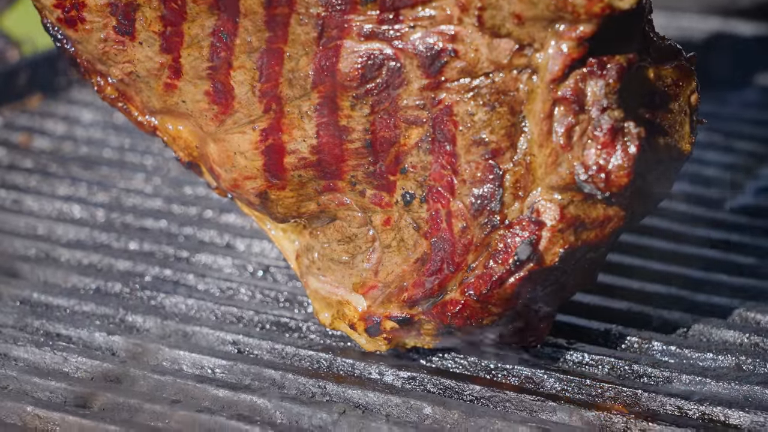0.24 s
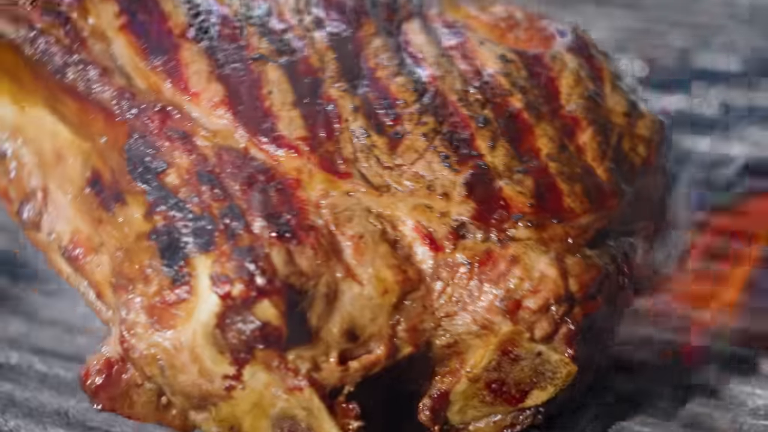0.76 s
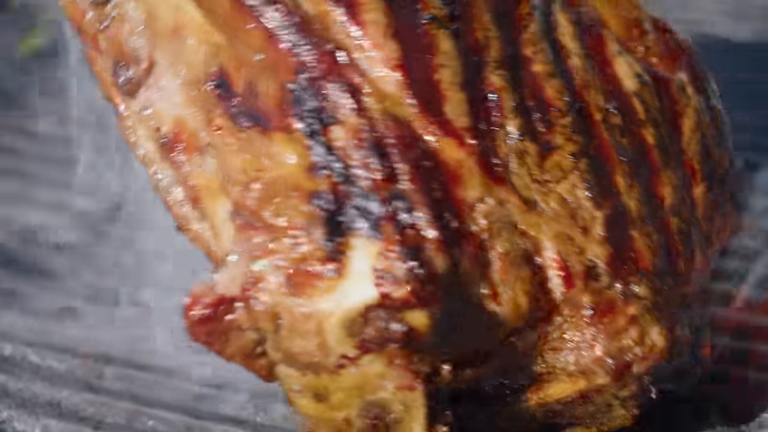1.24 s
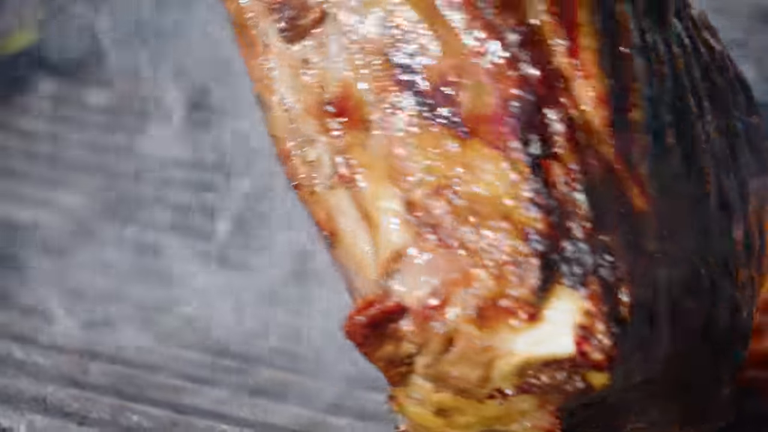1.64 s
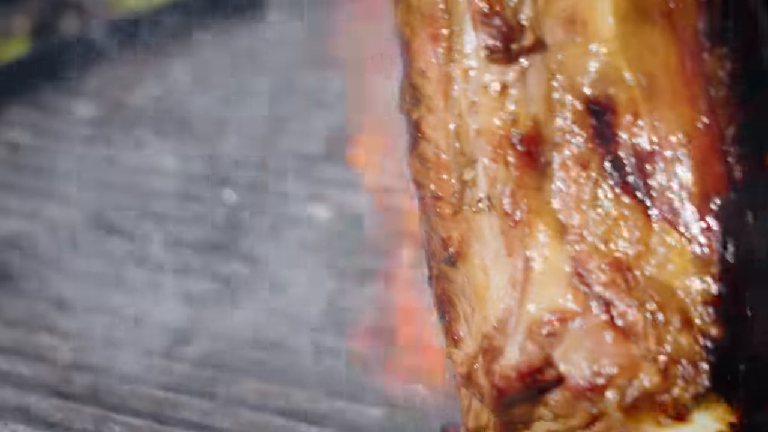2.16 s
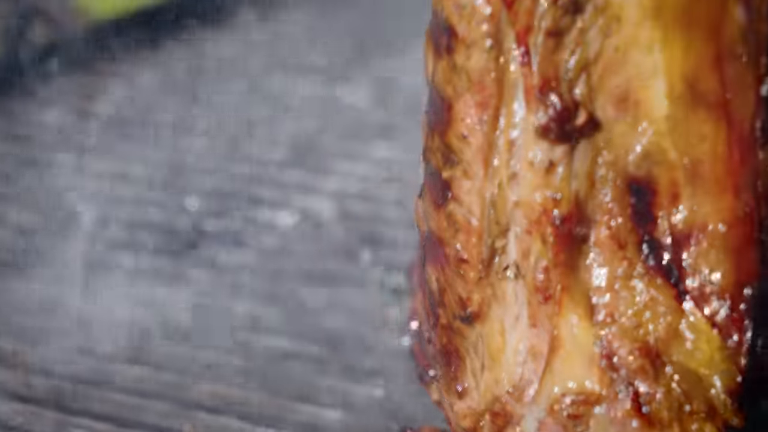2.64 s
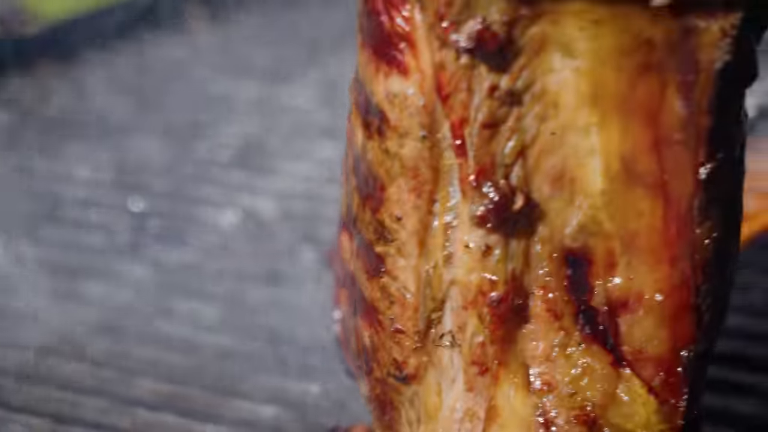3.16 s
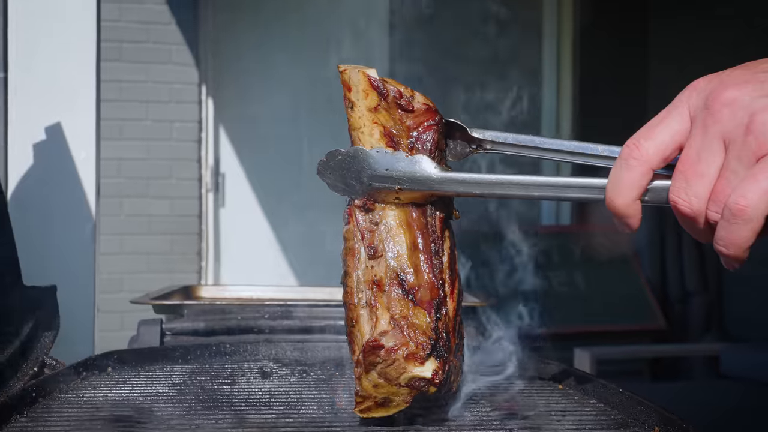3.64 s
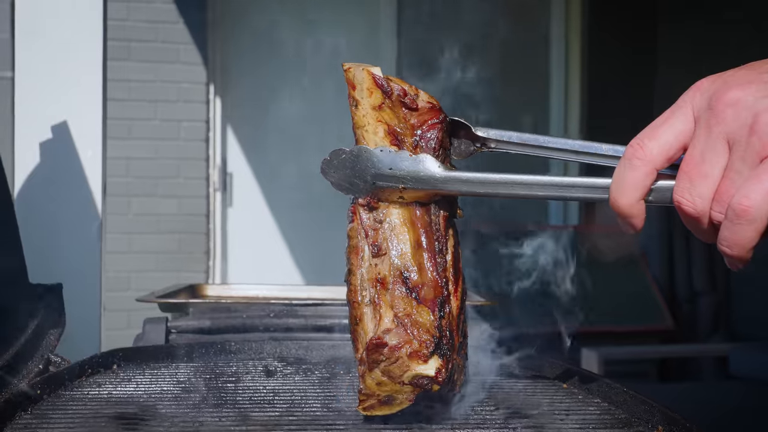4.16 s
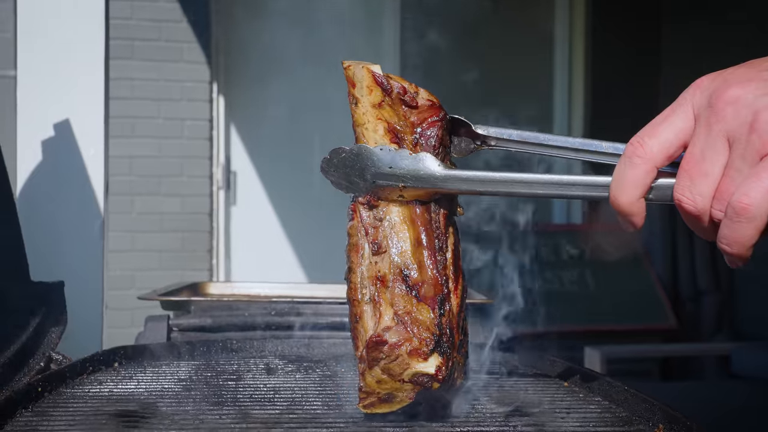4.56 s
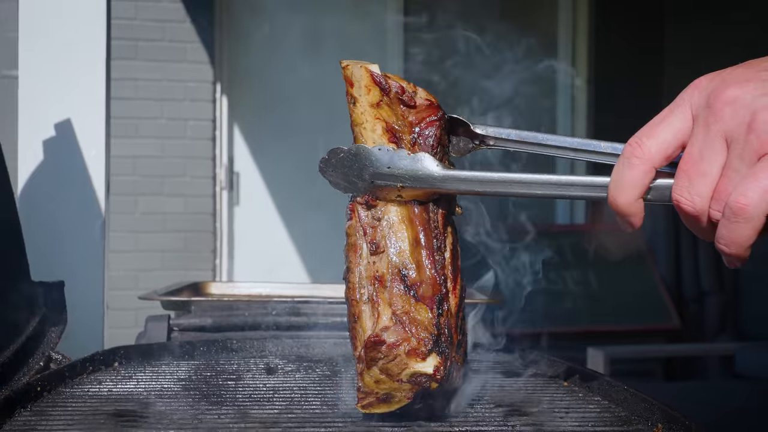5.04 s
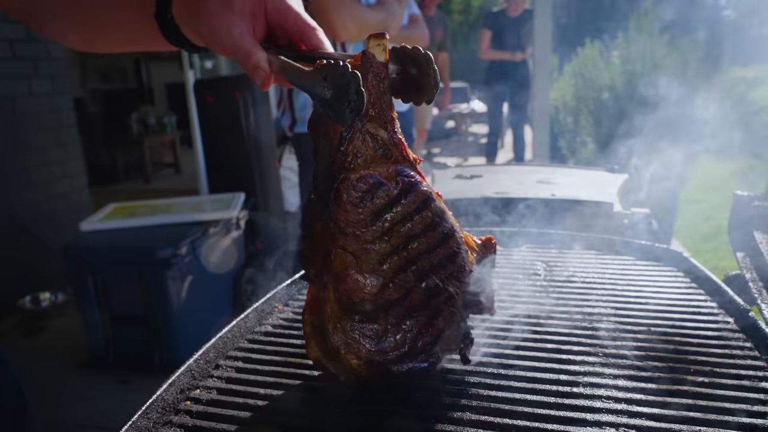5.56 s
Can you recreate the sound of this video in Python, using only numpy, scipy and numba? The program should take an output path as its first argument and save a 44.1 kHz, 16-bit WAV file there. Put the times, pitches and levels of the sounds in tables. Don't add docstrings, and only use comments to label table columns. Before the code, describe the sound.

Close, dry, mono sound of meat sizzling on a hot barbecue grate outdoors, about six seconds. A continuous frying hiss, grainy and centred in the middle and upper mids with softened treble, holds nearly steady while wavering quickly. Very faint fire flutter lies beneath. From 0 to 1.5 s, fat spits often: short ringing pops with dull knocks on the meat, strongest near 0.2, 0.7 and 0.9 s, mixed with brighter cracks and tiny sputtering runs. From 1.5 to 3 s it calms to sizzle with scattered ticks and small bubbles, a few pops around 1.8 to 2.3 s. A pop with a low puff comes at 3.2 s, more pops at 3.4 to 3.8 s, and another with a soft thump at 4.1 s. After a quieter stretch, 5.0 to 5.8 s brings a dense volley of hard pops and cracks, with the deepest flame puff and a swell of sizzle at 5.3 s.

```python
import sys
import numpy as np
from scipy import signal
from scipy.fft import rfft, irfft, next_fast_len
from scipy.io import wavfile
from scipy.ndimage import uniform_filter1d
from numba import njit

SR = 44100
rng = np.random.default_rng(int(sys.argv[2]) if len(sys.argv) > 2 else 0)


def magnitude_from_level(level_db):
    exponent = np.asarray(level_db, float) / 20
    return 10 ** exponent


def transcribe(u):
    v = np.clip(np.atleast_2d(u).T, -1, 1)
    q = np.round(v * 32767).astype(np.int16)
    wavfile.write(sys.argv[1], SR, q)


N = 256220

# f/Hz, level/dB
FIZZ_SPECTRUM = [(300, -5), (480, -19.5), (700, -9.5), (950, -3.5), (1800, 1.5), (3300, 0), (4200, -4),
                 (5400, -10), (6800, -16.5), (7400, -28)]


def fizz(dull_db, bright_db):
    steam = level(rng.standard_normal(N), -.5) * magnitude_from_level(1.5 * walk(50))
    boil = magnitude_from_level(1.3 * walk(45))
    dull = level(swarm(count=7000, low_hz=454., high_hz=4200., cycles=13.4, scatter_db=-.5), 0)
    bright = level(swarm(count=6000, low_hz=2700., high_hz=6760., cycles=5.8, scatter_db=3.), 0)
    bursting = (dull + steam) * magnitude_from_level(dull_db) + bright * magnitude_from_level(bright_db + 7.5)
    return colour(boil * bursting, FIZZ_SPECTRUM)


# t/s, peak level/dB, ring f/Hz, body level below 1 kHz/dB
POPS = [(0.0966, -21, 2120, -32), (0.184, -13.5, 2220, -21.5), (0.3622, -28, 1660, -32),
        (0.405, -17, 2900, -43), (0.4497, -17, 1640, -52), (0.5452, -17.5, 3080, -29),
        (0.7026, -8, 2120, -24), (0.772, -18, 2030, -44), (0.93, -9.5, 2060, -16.5),
        (1.051, -17, 2330, -33), (1.292, -18, 2120, -57), (1.4041, -18.5, 2700, -51),
        (1.7933, -35, 2040, -31), (1.8407, -19, 3760, -47), (1.914, -17, 2560, -39),
        (2.2723, -20, 1230, -33), (3.1771, -21.5, 1170, -26.5), (3.4155, -23, 2400, -33),
        (3.7787, -17, 2080, -28), (4.0702, -14.5, 1170, -36), (4.8369, -21, 2950, -33),
        (5.023, -12.5, 2910, -41), (5.1192, -15, 2170, -47), (5.1866, -9, 3820, -26),
        (5.2753, -8.5, 1800, -37), (5.2949, -11, 2190, -18.5), (5.547, -25, 2100, -29),
        (5.5785, -17.5, 2090, -23), (5.667, -14.5, 2080, -25.5), (5.763, -21.5, 3730, -35)]
# t/s, peak level/dB, ring f/Hz
BUBBLES = [(0.2927, -26, 3180), (0.5895, -23, 1110), (0.7525, -27, 3120), (0.8131, -22, 2100),
           (1.074, -20.5, 2170), (1.1009, -17.5, 2130), (1.2047, -25, 2150), (1.2231, -23.5, 3160),
           (1.261, -26, 2670), (1.531, -21, 1590), (1.6906, -21.5, 3600), (2.0063, -24, 1770),
           (2.536, -21, 1540), (2.6715, -25, 3420), (2.8457, -20.5, 1800), (3.0095, -22.5, 2130),
           (3.039, -24, 1600), (3.5818, -23, 3580), (3.7964, -20, 2660), (3.8333, -22, 2180),
           (3.8634, -22.5, 2520), (4.182, -21, 2370), (4.1934, -24, 2500), (4.3859, -22, 2000),
           (4.4902, -23, 2200), (4.802, -22, 2750), (4.8137, -19, 3840), (5.1198, -21, 1600),
           (5.1592, -20, 1540), (5.234, -22, 1800)]
# f/Hz, level/dB
BURST_SPECTRUM = [(500, -47), (1000, 3.5), (2200, 6.5), (3800, 2), (5000, -45)]
# f/Hz, level/dB
KNOCK_SPECTRUM = [(150, -33), (300, 7.5), (800, -7.5), (1300, 2.5)]
POP_RING_S, BUBBLE_RING_S = .014, .018
BUBBLE_KNOCK_DB = -32
KNOCK_HZ, KNOCK_RING_S = 820, .018


def bubbles():
    loose = strays(count=30, db=-31, scatter_db=22, low_hz=1115, high_hz=3600)
    pops = np.transpose(POPS)
    small = np.hstack([np.transpose(BUBBLES), loose])
    s, db, hz = np.hstack([pops[:-1], small])
    start = onset(s)
    body_db = np.append(pops[-1], small[1] + BUBBLE_KNOCK_DB)
    ring_s = np.repeat([POP_RING_S, BUBBLE_RING_S], [len(POPS), small.shape[1]])
    ring = grains(start, hz, ring_s, db - 6.5, rise=.027, build_cycles=.34)
    burst = splash(start, db - 17, BURST_SPECTRUM, fast_ms=3.9, slow_ms=13., tail_db=-20.)
    knock = splash(start, body_db - 12.5, KNOCK_SPECTRUM, fast_ms=3.6, slow_ms=18., tail_db=-16.5)
    thud_hz, thud_s = np.full_like(s, KNOCK_HZ), np.full_like(s, KNOCK_RING_S)
    thud = grains(start, thud_hz, thud_s, body_db - 3, build_cycles=.65)
    snap = grains(start, hz, 2.9 / hz, db - 10.5)
    return echoes(ring + snap) + burst + knock + thud


# t/s, peak level/dB, ring f/Hz, thrown spray level/dB
SPITS = [(0.0958, -18.5, 5360, -33), (0.1845, -19.5, 4450, -31), (0.3631, -14.5, 5800, -21.5),
         (0.658, -26, 5690, -27), (0.7028, -32, 4380, -32), (0.7743, -26, 4770, -39),
         (0.8886, -33, 4400, -58), (0.9313, -18, 6020, -33), (0.9522, -28, 4500, -46),
         (1.0505, -18, 6100, -27.5), (1.074, -21, 4370, -35), (1.1562, -28, 4450, -44),
         (1.4047, -23, 4150, -60), (1.4867, -22, 4270, -60), (1.7933, -27.5, 4260, -38),
         (1.8422, -21, 5400, -28), (2.2722, -36, 4430, -34.5), (3.1782, -23.5, 4300, -42),
         (3.708, -25, 4400, -27.5), (3.7793, -19, 4400, -26.5), (4.0701, -19.5, 4430, -29.5),
         (5.0225, -25.5, 3500, -62), (5.1193, -22.5, 5520, -27), (5.1866, -21, 4200, -30.5),
         (5.2754, -15, 5180, -28), (5.2949, -15.5, 6660, -24), (5.5473, -24.5, 5490, -34),
         (5.5777, -18.5, 6900, -28), (5.667, -22.5, 4740, -33.5), (5.7636, -20, 4600, -31)]
# t/s, crack level/dB, spray level/dB
TICKS = [(0.045, -26, -43.5), (0.397, -40, -43), (0.498, -42, -45), (0.576, -44, -39), (0.8103, -43, -44),
         (0.8405, -41, -48), (1.0101, -39, -45), (1.2411, -34, -51), (1.456, -36, -45), (1.5422, -42, -47),
         (1.879, -40, -45), (1.977, -31, -46), (2.4264, -40, -44.5), (2.447, -42, -45), (2.722, -31, -47),
         (2.838, -40, -40.5), (3.049, -25.5, -62), (3.124, -44, -46), (3.4396, -42, -48),
         (3.5548, -42, -42), (3.6534, -39, -44), (3.7414, -32, -43), (4.7266, -26, -66), (4.8524, -24, -42),
         (4.999, -40, -43), (5.153, -26, -58), (5.2614, -42, -45), (5.3298, -28, -37), (5.4221, -31, -53),
         (5.56, -42, -34)]
# f/Hz, level/dB
CRACK_SPECTRUM = [(2800, -5), (4200, 0), (5600, -4), (7000, -8), (8000, 0)]
TICK_RING_HZ = 4400


def spits():
    tick_s, tick_db, _ = np.transpose(TICKS)
    ticks = [tick_s, tick_db, np.full_like(tick_s, TICK_RING_HZ)]
    loose = strays(count=30, db=-33.5, scatter_db=4, low_hz=4200, high_hz=5000)
    s, db, hz = np.hstack([np.transpose(SPITS)[:-1], ticks, loose])
    start = onset(s)
    ring = grains(start, hz, 42.5 / hz, db - 4.5, build_cycles=1.5)
    snap = grains(start, 1.03 * hz, 4. / hz, db)
    gust = splash(start, db - 8.5, CRACK_SPECTRUM, fast_ms=1.4, slow_ms=6.4, tail_db=-10)
    return echoes(ring + snap) + gust


# start t/s, length/s, peak level/dB, f/Hz
SPUTTERS = [(0.14, 0.044, -27.5, 3350), (0.295, 0.043, -31, 3030), (0.395, 0.026, -28.5, 3180),
            (0.49, 0.04, -25.5, 3200), (0.535, 0.033, -29, 3000), (0.74, 0.051, -28.5, 3140),
            (1.21, .035, -31, 3000), (2.66, 0.043, -27.5, 3230), (3.0, 0.055, -30, 2600),
            (3.8, .07, -30, 2370), (4.43, 0.079, -36, 2800), (5.09, 0.023, -33, 1590)]


def sputters(count=10):
    s, length, db, hz = np.repeat(SPUTTERS, count, axis=0).T
    when, size, pitch = rng.random((len(s), 3)).T
    bubble_hz = hz * (1 + .3 * (pitch - .5))
    return grains(s + when * length, bubble_hz, 24. / hz, db + 10. * (size - .5), build_cycles=.71)


def crackle():
    return level(swarm(count=1400, low_hz=1800., high_hz=5850., cycles=3.4, scatter_db=5.), -49.5)


# f/Hz, level/dB
SPRAY_SPECTRUM = [(6000, -5.5), (7300, 1), (8600, -5.5), (9900, -11.5), (11000, -17), (11800, -16.5),
                  (12300, -43)]


def spray(db):
    ticks = level(swarm(count=2500, low_hz=7000., high_hz=12000., cycles=8., scatter_db=5.5), -3)
    mist = rng.standard_normal(N) * magnitude_from_level(8.8 * walk(60))
    loose = strays(count=90, db=-61, scatter_db=14, low_hz=1, high_hz=1)[:2]
    s, thrown_db = np.hstack([np.transpose(SPITS)[[0, -1]], np.transpose(TICKS)[[0, -1]], loose])
    thrown = splash(onset(s), thrown_db - 3., SPRAY_SPECTRUM, fast_ms=1.5, slow_ms=7.8, tail_db=-21.)
    return level(colour(ticks + mist, SPRAY_SPECTRUM), 0) * magnitude_from_level(db + 4) + thrown


# t/s, peak level/dB, f/Hz
PUFFS = [(0.18, -51, 293), (0.362, -40, 300), (0.702, -47, 292), (0.932, -49, 170), (3.18, -32, 220),
         (3.199, -38, 60), (3.616, -37.5, 55), (3.851, -33, 75), (4.075, -27.5, 108), (4.083, -30, 199),
         (5.2995, -18, 131), (5.333, -28, 72.7), (5.576, -33, 168)]
# f/Hz, level/dB
FLAME_SPECTRUM = [(15, -30), (25, -3), (60, 2), (150, -1.5), (270, -6.5), (400, -15.5), (650, -22.5)]


def flames(db):
    s, puff_db, hz = np.transpose(PUFFS)
    gusts = rng.standard_normal(N) * magnitude_from_level(4 * walk(30) + walk(8))
    flutter = level(colour(gusts, FLAME_SPECTRUM), 0) * magnitude_from_level(db)
    puffs = grains(s - .003, hz, 4.4 / hz, puff_db + 6.5, build_cycles=.31)
    return flutter + puffs


# lag t/s, level/dB
ECHOES = [(.0009, -21.5), (.0018, -15.5), (.0031, -20), (.0052, -20.5), (.0087, -14.5)]


def echoes(x):
    out = x.copy()
    for k, (lag_s, db) in enumerate(ECHOES):
        out += (-1) ** k * magnitude_from_level(db) * np.roll(x, int(lag_s * SR))
    return out


def onset(s):
    pop_s = np.transpose(POPS)[0]
    near = pop_s[np.abs(s[:, None] - pop_s).argmin(axis=1)]
    delay_s = .0008
    return np.where(np.abs(near - s) < .004, near, s) + delay_s


def strays(count, db, scatter_db, low_hz, high_hz):
    when, size, pitch = rng.random((count, 3)).T
    s = when * (N / SR - .01)
    return s, db + scatter_db * (size - .5), low_hz * (high_hz / low_hz) ** pitch


def swarm(count, low_hz, high_hz, cycles, scatter_db):
    when, pitch, ring, size = rng.random((count, 4)).T
    hz = low_hz * (high_hz / low_hz) ** pitch
    rare = -np.log(size + .015)
    return grains(when * N / SR, hz, cycles * (.5 + ring) / hz, scatter_db * rare, rise=.3, build_cycles=.4)


def grains(s, hz, t60, db, rise=0., build_cycles=.062):
    hz = np.clip(hz, 30, .4 * SR)
    t60 = np.clip(t60, .001, .1)
    length = (t60 * SR).astype(np.int64)
    turn = np.exp(2j * np.pi * hz / SR - np.log(1000) / (t60 * SR))
    glide = np.exp(2j * np.pi * hz / SR * rise / length)
    swell = np.exp(-hz / (SR * max(build_cycles, .02)))
    return rings((s * SR).astype(np.int64), turn, glide, magnitude_from_level(db) + 0j, swell, length)


@njit
def rings(start, turn, glide, size, swell, length):
    out = np.zeros(N)
    for k in range(len(start)):
        z, p, held = size[k], turn[k], 1.
        for i in range(start[k], min(N, start[k] + length[k])):
            held = max(held * swell[k], 1e-9)
            out[i] += z.imag * (1 - held)
            z *= p
            p *= glide[k]
    return out


def splash(s, db, shape, fast_ms, slow_ms, tail_db):
    hits = np.full(N, 1e-18)
    np.add.at(hits, (s * SR).astype(int), magnitude_from_level(db))

    def fade(ms):
        decay = np.exp(-1000 / (np.clip(ms, .2, 30) * SR))
        return signal.lfilter([1], [1, -decay], hits)

    noise = level(colour(rng.standard_normal(N), shape), 0)
    gust = fade(fast_ms) + magnitude_from_level(tail_db) * fade(slow_ms)
    return noise * uniform_filter1d(gust, size=41, origin=10)


def walk(rate):
    k = int(SR / rate)
    held = np.repeat(rng.standard_normal(N // k + 1), k)
    return .77 * uniform_filter1d(uniform_filter1d(held, k), k)[:N]


def colour(x, shape):
    hz, db = np.transpose(shape)
    n = next_fast_len(N)
    log_hz = np.log(np.arange(1, n // 2 + 2) * SR / n)
    gain_db = np.interp(log_hz, np.log(hz), db, db[0] - 41, db[-1] - 40)
    return irfft(rfft(x, n) * magnitude_from_level(gain_db), n)[:N]


def level(x, db):
    return x * magnitude_from_level(db) / np.sqrt(np.mean(x ** 2))


# t/s, spitting heat level/dB, flame flare level/dB
HEAT = [(0.0, 8.5, 0.5), (1.03, 8, 2), (1.3, 6.5, -1.5), (1.6, -0.5, -3), (2.0, 6, -0.5), (2.25, 1, -5.5),
        (2.45, 0.5, 1), (3.0, -2, -2.5), (3.2, -0.5, -2), (3.7, 6.5, 1.5), (4.1, 1, 2.5), (4.5, -4, 1.5),
        (5.0, 6.5, 2), (5.24, 6, 2), (5.31, 12, 9), (5.45, 9, 0), (5.62, 4, 2.5), (5.81, 10, 1.5)]
FIZZ_DB, BRIGHT_DB, SPRAY_DB, FLAME_DB = -39, -49.5, -80, -47.5
FIZZ_PER_HEAT, BRIGHT_PER_HEAT, FIZZ_PER_FLARE = .008, .083, .14
DULL_HZ = 6670


def scene():
    s, *columns = np.transpose(HEAT)
    heat_db, flare_db = (np.interp(np.arange(N) / SR, s, c) for c in columns)
    treble_cut = signal.ellip(6, .5, 45, DULL_HZ, fs=SR, output="sos")
    bursts = signal.sosfilt(treble_cut, spits() + bubbles() + crackle() + sputters())
    dull_db = FIZZ_DB + FIZZ_PER_HEAT * heat_db + FIZZ_PER_FLARE * flare_db
    boil = fizz(dull_db, BRIGHT_DB + BRIGHT_PER_HEAT * heat_db)
    return (boil + spray(SPRAY_DB + heat_db) + bursts + flames(FLAME_DB + flare_db))[None]


def roll_off(x):
    return signal.sosfilt(signal.butter(12, 12360, fs=SR, output="sos"), x)


def record(dry):
    soft = signal.butter(4, 10800., fs=SR, output="sos")
    top = signal.ellip(8, .2, 70, 12000, fs=SR, output="sos")
    mix = signal.sosfilt(np.vstack([soft, top]), dry)
    return roll_off(mix)


dry = scene()
out = record(dry)
transcribe(out)
```